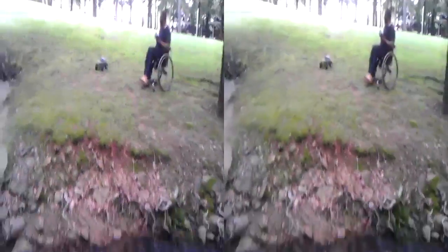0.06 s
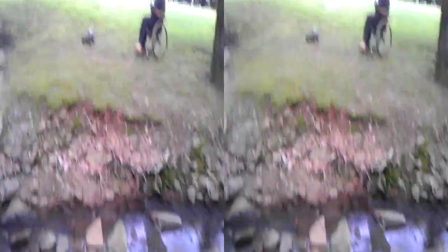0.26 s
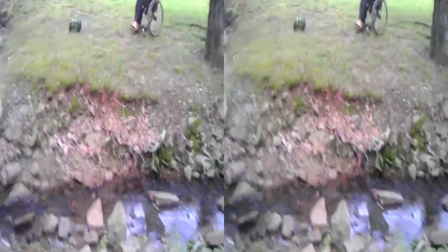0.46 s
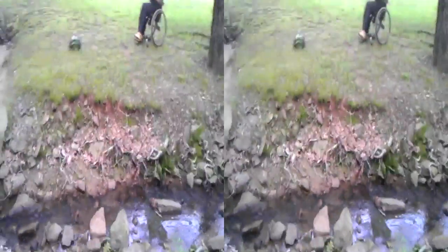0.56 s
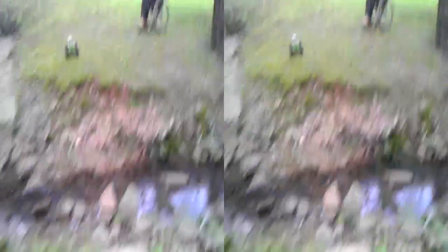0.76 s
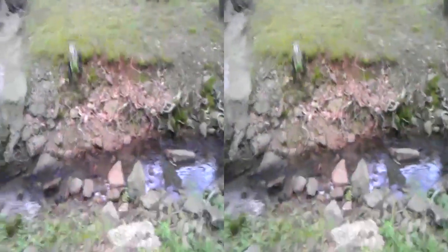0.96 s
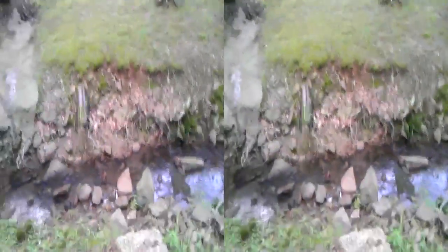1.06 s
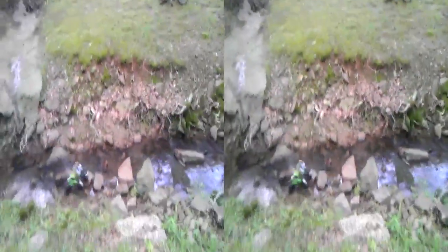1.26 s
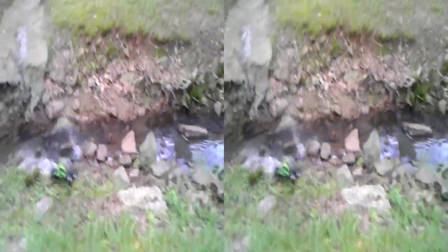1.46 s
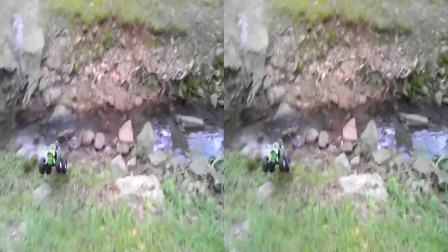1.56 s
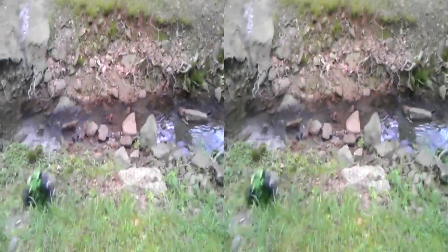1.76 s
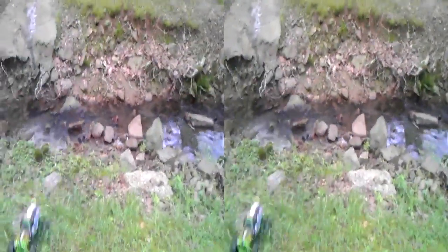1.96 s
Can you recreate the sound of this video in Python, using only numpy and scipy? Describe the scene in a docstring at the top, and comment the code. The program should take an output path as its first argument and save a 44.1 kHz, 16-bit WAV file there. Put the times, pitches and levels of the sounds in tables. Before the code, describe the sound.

A small electric toy truck whines across bumpy grass, jumps, slams down with a crack, bounces on

```python
"""Bumpy grass and a stony creek bank: a small electric toy truck runs up, jumps, slams down and bounces on.
Stacked overtones make its gear whine, which sags under load; shaped noise makes the tyre rush and scrapes.
Short decaying sines make the chassis thumps; struck plastic modes and noise make the slam and light knocks.
Two microphone ports hear it with their own colour and phase, and the recorder clips hard peaks."""
import sys
import numpy as np
from scipy import signal
from scipy.fft import rfft, irfft, next_fast_len
from scipy.io import wavfile
from scipy.ndimage import uniform_filter1d, map_coordinates

SR = 44100
rng = np.random.default_rng(int(sys.argv[2]) if len(sys.argv) > 2 else 0)


def natural_amplitude(level_db):
    """Convert a level in decibels to a linear amplitude factor, elementwise."""
    exponent = np.asarray(level_db, float) / 20
    return 10 ** exponent


def master_out(mix):
    """Clip the mix to full scale and print it as 16-bit PCM to the path in sys.argv[1]."""
    frames = np.transpose(np.atleast_2d(mix))
    ceiling = np.clip(frames, -1, 1)
    pcm = np.round(ceiling * 32767).astype(np.int16)
    wavfile.write(sys.argv[1], SR, pcm)


N = 88508  # samples, about 2 s


def unit(x):
    """Scale to rms 1."""
    return x / np.sqrt(np.mean(x ** 2) + 1e-20)


def along(points, hz):
    """Interpolate (Hz, value) points on a log frequency axis."""
    f, v = np.transpose(points)
    return np.interp(np.log(hz + 1), np.log(f + 1), v)


def curves(rows):
    """One value per sample for each column after the time."""
    s, *columns = np.transpose(rows)
    return [np.interp(np.arange(N) / SR, s, column) for column in columns]


def wobble(rate):
    """A smooth random curve with rate knots a second."""
    knots = rng.standard_normal(int(N * rate / SR) + 4)
    return map_coordinates(knots, [np.arange(N) * rate / SR])


def filtered(x, response):
    """Filter x by a complex response of frequency."""
    m = next_fast_len(N + SR // 2)
    return irfft(rfft(x, m) * response(np.fft.rfftfreq(m, 1 / SR)), m)[..., :N]


def patchy_noise(spectrum, patchy_db):
    """Coloured noise of rms 1 whose gain varies in patches of time and frequency."""
    z = signal.stft(rng.standard_normal(N), nperseg=512)[2]
    field = uniform_filter1d(rng.standard_normal(z.shape), size=5, axis=0)
    field = uniform_filter1d(field, size=4, axis=1)
    noise = signal.istft(z * natural_amplitude(patchy_db * unit(field)), nperseg=512)[1][:N]
    return unit(filtered(noise, lambda hz: natural_amplitude(along(spectrum, hz))))


def hiss():
    """Faint independent white noise in each channel."""
    return natural_amplitude(-62) * rng.standard_normal((2, N))


def tyres():
    """Many small contacts of wheels with grass and soil blur into rush, fizz and rumble."""
    # rush of tyres and drivetrain: time_s, body_db, treble_db (mean levels)
    rush_levels = [(0, -39, -58.5), (.38, -38.5, -53.5), (.5, -32, -49.5), (.81, -34, -47), (1.0, -26, -44),
                   (1.1, -29.5, -44), (1.21, -29.5, -45.5), (1.39, -31, -49), (1.44, -26, -37.5),
                   (1.58, -27, -40.5), (1.78, -27, -30.5), (2.007, -29, -34)]
    # rumble of wheels on soil: time_s, level_db (mean)
    roll_levels = [(0, -40), (.52, -35), (.8, -36.5), (1.2, -39), (1.38, -34.5), (1.5, -28.5),
                   (1.74, -44.5), (1.92, -24.5), (2.007, -32)]
    # relative spectra of rush, its treble fizz, and rumble: frequency_hz, density_db
    body_colour = [(300, -57), (450, -19), (1000, -5.5), (1650, -6), (2200, -9), (3100, -8), (4200, -14.5),
                   (6000, -28.5)]
    fizz_colour = [(2500, -44.5), (3800, -30), (5200, -3.5), (6400, 2), (9000, -12.5)]
    soil_colour = [(20, -41), (90, -10.5), (200, -10), (330, -9), (650, -19.5), (900, -8.5), (1500, -37)]
    body_db, treble_db = curves(rush_levels)
    roll_db, = curves(roll_levels)
    body = natural_amplitude(body_db + 0.35 * wobble(41.05)) * patchy_noise(body_colour, patchy_db=3.0)
    fizz = natural_amplitude(treble_db + 1.8 * wobble(49.27)) * patchy_noise(fizz_colour, patchy_db=5.0)
    rumble = natural_amplitude(roll_db + 0.61 * wobble(25)) * patchy_noise(soil_colour, patchy_db=3.5)
    return body + fizz + rumble


def scrapes():
    """The shell rubs on ground: grainy noise in its colour swells quickly and dies away."""
    # scrapes: start_s, level_db (before grain), t60_s
    scrape_list = [(0.912, -23.5, 0.039), (1.242, -15, 0.099), (1.258, -12, 0.12), (1.289, -19, 0.37),
                   (1.312, -31, 0.07), (1.438, -28, 1), (1.892, -18.5, 0.15), (1.932, -26.5, 0.22)]
    # relative spectrum of the rubbed shell: frequency_hz, density_db
    shell_colour = [(150, -38.5), (300, -7.5), (750, 1.5), (1250, -5.5), (2300, -9.5), (4000, -15),
                    (6500, -20.5), (9000, -33.5)]
    rise_s, grit_db = 0.013, 3
    t = np.arange(N) / SR
    envelope = np.zeros(N)
    for start, db, t60 in scrape_list:
        rise = np.exp(-(np.clip(start - t, 0, 2) / rise_s) ** 2)
        fall = natural_amplitude(db - 60 * np.clip(t - start, 0, 2) / max(t60, .01))
        envelope += rise * fall
    grain = unit(natural_amplitude(grit_db * wobble(250)))
    return envelope * grain * patchy_noise(shell_colour, patchy_db=1.0)


def thumps():
    """Each bump pushes the hollow chassis into a short low ring."""
    # chassis thumps: start_s, relative level_db, pitch_hz
    thump_list = [(0.499, -25.5, 328), (0.668, -27.5, 181), (0.878, -19.5, 182), (0.981, -18.5, 148.1),
                  (1.046, -23.5, 167.3), (1.231, -11, 189.7), (1.241, -8.5, 210), (1.253, -8, 248.9),
                  (1.424, -20.5, 246.6), (1.486, -19.5, 248), (1.539, -25.5, 325), (1.81, -23.5, 265.3),
                  (1.882, -23.5, 268), (1.909, -17.5, 288), (1.94, -19, 275)]
    t60_s, rise_s = 0.042, 0.0022
    makeup_db = 8.5  # for the level that the soft onset takes away
    out, t = np.zeros(N + SR), np.arange(SR // 4) / SR
    onset = (1 - np.exp(-t / rise_s)) ** 2
    for start, db, hz in thump_list:
        decay = natural_amplitude(db + makeup_db - 60 * t / t60_s)
        out[round(start * SR):][:len(t)] += decay * onset * np.sin(2 * np.pi * hz * t)
    return out[:N]


def slam():
    """Light knocks and the slam's quick hard blows ring the modes of the plastic shell and add a noisy crack."""
    # light knocks before and after the slam's hard blows: start_s, relative level_db
    blows = [(0.8543, -22.5), (1.222, -25.5), (1.2454, 0), (1.247, -5), (1.2523, -12.5), (1.2832, -20)]
    # ringing modes of the plastic shell: pitch_hz, mean level_db, t60_s
    plastic_modes = [(810, 2.5, 0.011), (1787, 3.5, 0.02), (2170, -1.5, 0.037), (3370, -15.5, .015),
                     (4774, 6, 0.011), (6297, -3, 0.012)]
    crack_level, crack_t60_s, rise_s = 0.76, 0.022, 0.00082
    out, t = np.zeros(N + SR), np.arange(SR // 4) / SR
    onset = 1 - np.exp(-t / rise_s)
    for start, db in blows:
        ring = np.zeros(len(t))
        for hz, mode_db, t60 in plastic_modes:
            # each blow excites the modes a little differently
            decay = natural_amplitude(mode_db + rng.normal(0, 1.5) - 60 * t / t60)
            ring += decay * np.sin(2 * np.pi * hz * t)
        soft_noise = unit(uniform_filter1d(rng.standard_normal(len(t)), size=4))
        crack = crack_level * natural_amplitude(-60 * t / crack_t60_s) * soft_noise
        out[round(start * SR):][:len(t)] += natural_amplitude(db) * onset * (ring + crack)
    return out[:N]


def gears():
    """Tooth contacts make a stack of overtones that swells once per turn of the slightly eccentric gear."""
    # gear mesh: time_s, mean pitch_hz, base fundamental_db, base overtones_db
    mesh = [(0, 760, -64, -86), (.05, 803, -43, -39), (.07, 720, -46, -40.5), (.18, 778, -47.5, -54.5),
            (.205, 622.5, -52, -36), (.28, 728.5, -52, -47.5), (.32, 795.4, -49, -50),
            (.335, 787, -35, -43), (.36, 672, -65, -37.5), (.39, 766.6, -40.5, -45), (.41, 839.5, -27, -40),
            (.44, 1032, -30, -48.5), (.46, 1274, -30, -56.5), (.495, 1332, -31.5, -45),
            (.528, 1238, -30, -50.5), (.56, 1308, -33, -47.5), (.592, 1144, -32, -38),
            (.612, 1247, -28, -52), (.648, 1484, -36.5, -38), (.68, 1325, -30.5, -52),
            (.72, 1367, -38.5, -46.5), (.755, 1245, -35, -45.5), (.79, 1463, -46, -33.5),
            (.84, 1484, -45, -48), (.858, 1444, -27.5, -35), (.88, 1191, -34, -30), (.9, 1279, -54, -44),
            (.925, 1465, -60, -36), (.96, 1571, -37.5, -41.5), (1.21, 1641, -42, -46.5),
            (1.27, 800, -45, -61.5), (1.315, 850.8, -32, -41.5), (1.335, 1003, -44, -32),
            (1.35, 1043, -69, -55), (1.488, 1208, -41, -42.5), (1.5, 1073, -17.5, -31.5),
            (1.525, 879, -34.5, -36.5), (1.55, 1015, -28.5, -32), (1.585, 1133, -30, -54),
            (1.615, 1539, -62, -34.5), (1.81, 1607, -43.5, -65), (1.828, 1367, -20.5, -32.5),
            (1.85, 1156, -18.5, -40.5), (1.885, 1307, -20, -58), (1.912, 1172, -22.5, -39),
            (1.932, 949.3, -17.5, -24), (1.952, 1105, -34, -41), (2.007, 1065, -41, -42)]
    # overtones: multiple, share of overtones_db (0 to 1), offset_db
    overtones = [(1, 0, 5), (2, 0.83, -3), (3, 0.47, -8.5), (4, 0.97, -1), (6, 0, -28)]
    # colour of the gearbox case: frequency_hz, gain_db
    housing = [(1500, -4.5), (2700, 2.5), (3800, 5.5), (4500, 3.5), (5800, -3)]
    teeth_per_turn, runout = 24, 0.45  # runout: depth of the once-a-turn swell
    jitter, flutter_db = 0.01208, 3.5  # pitch scatter as a fraction, level scatter
    hz, low_db, high_db = curves(mesh)
    hz = uniform_filter1d(hz, size=400) * (1 + jitter * wobble(150))
    phase = 2 * np.pi * np.cumsum(hz) / SR
    swell = 1 + runout * np.sin(phase / teeth_per_turn)
    whine = np.zeros(N)
    for k, share, offset_db in overtones:
        mesh_db = low_db + share * (high_db - low_db) + offset_db
        level_db = mesh_db + along(housing, k * hz) + flutter_db * wobble(80)
        whine += natural_amplitude(level_db) * np.sin(k * phase + rng.uniform(0, 2 * np.pi))
    return np.sqrt(2) * swell * whine


def scattered(x):
    """Ground and trees return short random echoes, whose pattern changes as the truck moves."""
    # returned sound: frequency_hz, gain_db
    scatter_colour = [(40, -8.5), (600, -16), (2800, -1.5), (8000, 0)]
    t60_s = 0.03
    t = np.arange(N) / SR
    tail_t = t[:SR // 10]
    wet = np.zeros((2, N))
    for place_s in np.arange(0, 2.1, .1):
        tail = rng.standard_normal((2, SR // 10)) * natural_amplitude(-60 * tail_t / t60_s)
        fade = np.cos(np.pi / 2 * np.clip((t - place_s) * 10, -1, 1))
        wet += signal.fftconvolve((x * fade)[None], tail / np.linalg.norm(tail[0]), axes=1)[:, :N]
    return filtered(wet, lambda hz: natural_amplitude(along(scatter_colour, hz)))


def port_pair(x, lead):
    """Split x over two microphone ports that differ in level and phase with frequency."""
    # left port over right: frequency_hz, difference_db
    tilt = [(300, 0.7), (1200, -1.5), (2200, -8.5), (4100, 4.5), (8400, -5)]
    sides = np.array([[.5], [-.5]])  # half of each difference goes to either port
    lead_hz, lead_rad = np.transpose([(0.005, 0.026), *lead])

    def response(hz):
        return natural_amplitude(sides * along(tilt, hz)) * np.exp(1j * sides * np.interp(hz, lead_hz, lead_rad))

    return filtered(x, response)


def ports(x):
    """Direct sound turns from the far to the near phase lead of the ports; scattered sound joins it."""
    # phase by which the left port leads, far and near truck: frequency_hz, lead_rad
    far_lead = [(2760, .5), (4570, 3.2), (5100, 6), (8500, 7)]
    near_lead = [(1700, .3), (2500, 1.6), (4400, 8), (8500, 12.8)]
    swing_s, swing_length_s = 1.5, .06
    t = np.arange(N) / SR
    near = np.clip((t - swing_s) / swing_length_s + .5, 0, 1)
    return port_pair(x * (1 - near), far_lead) + port_pair(x * near, near_lead) + scattered(x)


def scene():
    """The truck as both ports hear it, over faint hiss."""
    truck = tyres() + scrapes() + thumps() + slam() + gears()
    return hiss() + ports(truck)


def top_cut(x):
    """Nothing passes above the cut-off."""
    return signal.sosfilt(signal.butter(12, 8980, fs=SR, output="sos"), x)


def record(dry):
    """The microphone rolls off the bass, the band ends sharply and the recorder clips at full scale."""
    low_hz, top_hz, clip_level = 65, 8985, 1.0

    def microphone(hz):
        return (hz < top_hz) * (1j * hz / (low_hz + 1j * hz)) ** 2

    mix = np.clip(filtered(dry, microphone), -clip_level, clip_level)
    return top_cut(mix)


dry = scene()
out = record(dry)
master_out(out)
```